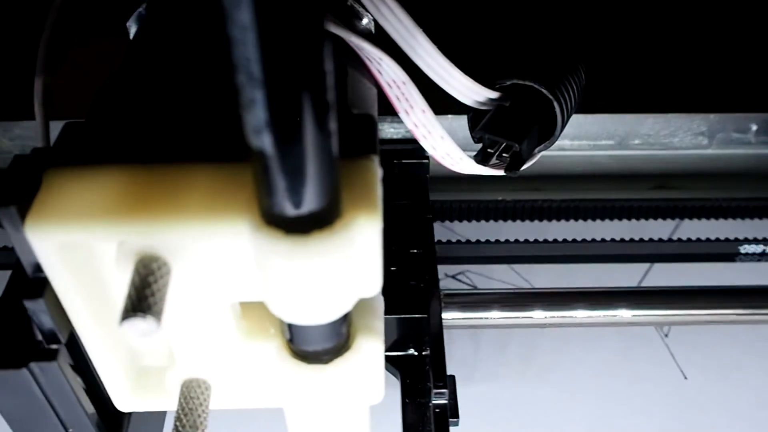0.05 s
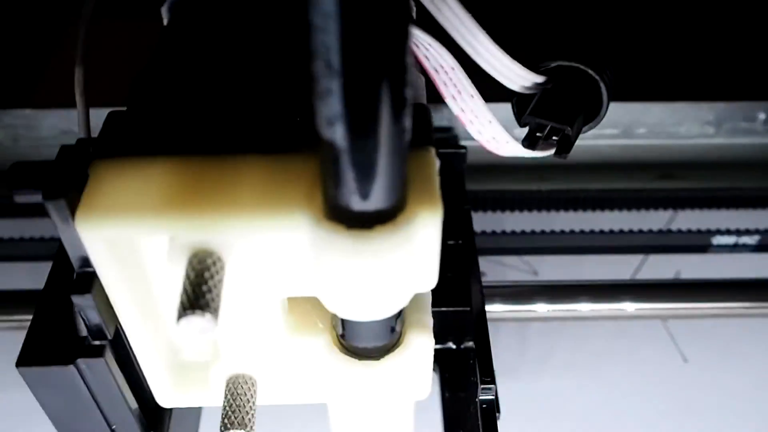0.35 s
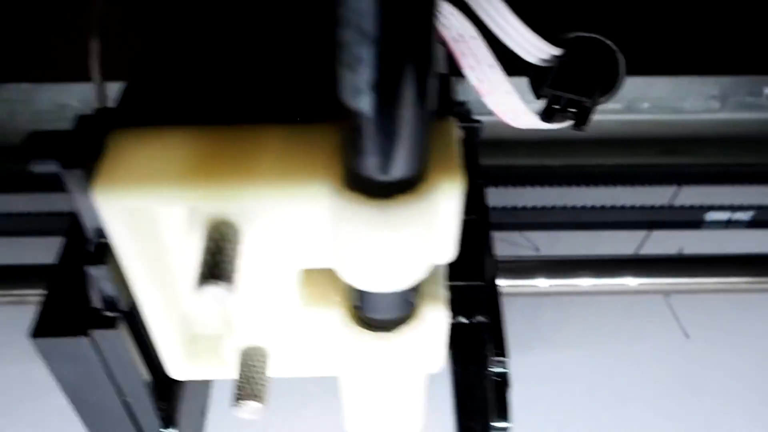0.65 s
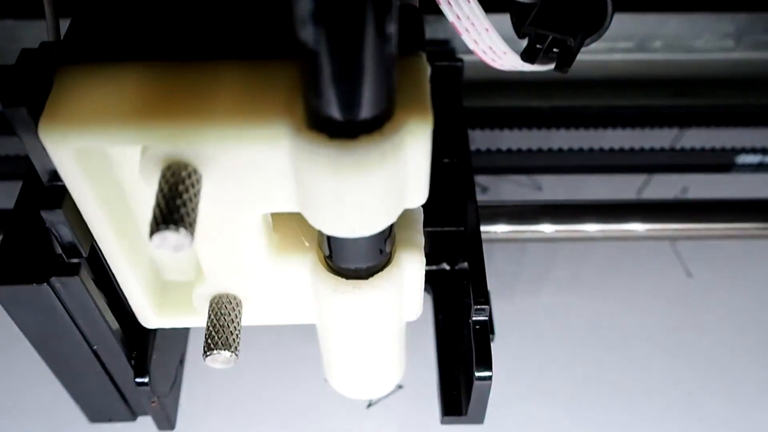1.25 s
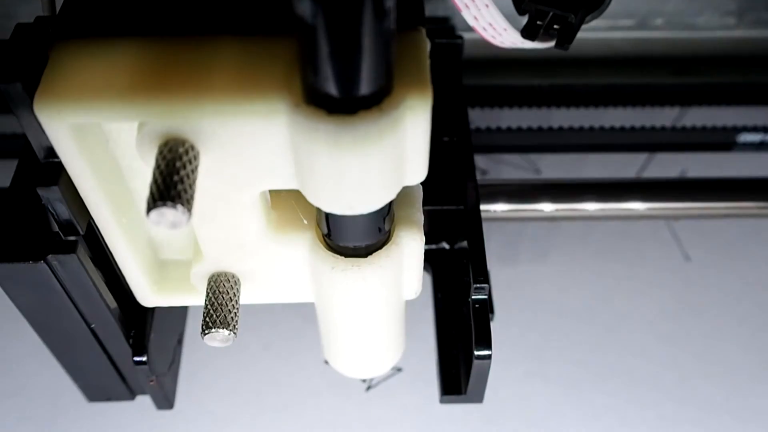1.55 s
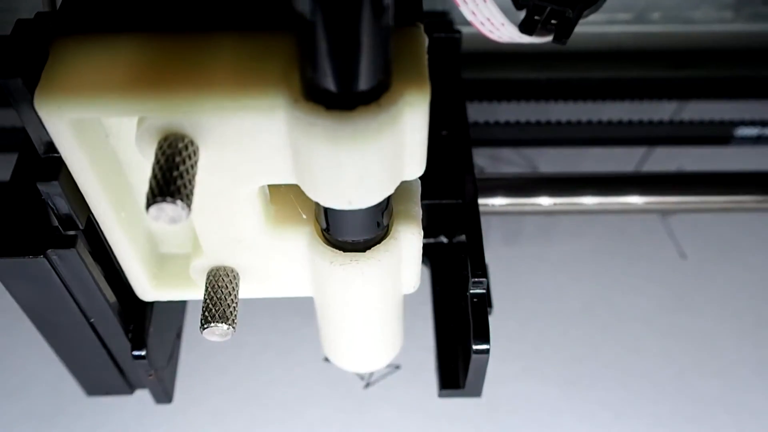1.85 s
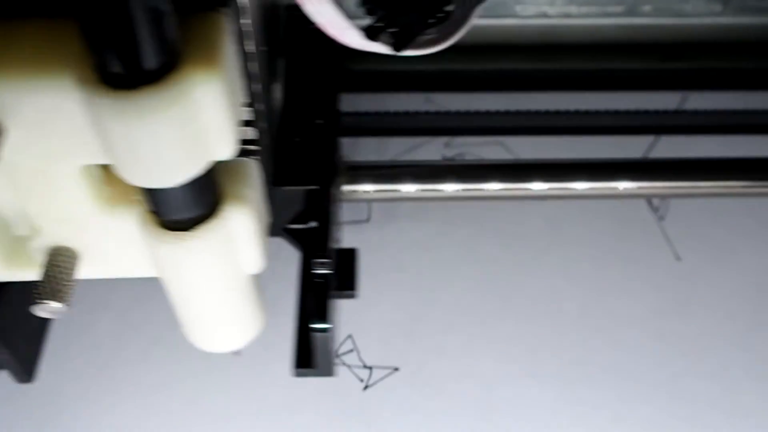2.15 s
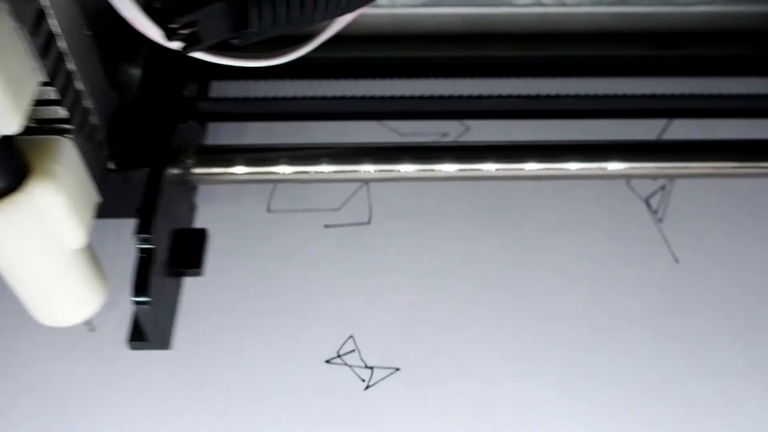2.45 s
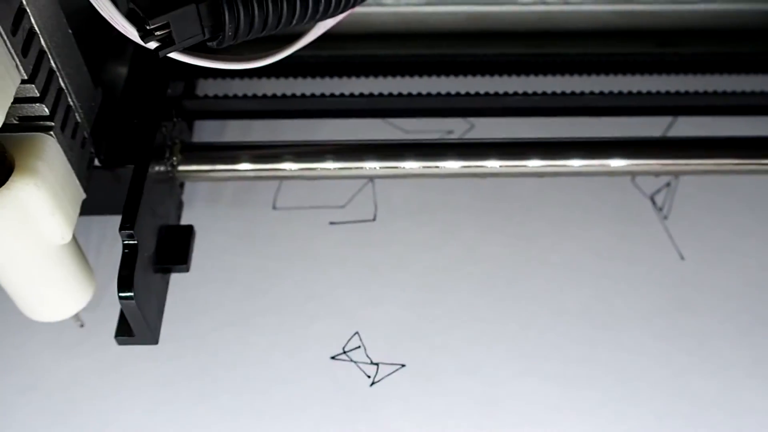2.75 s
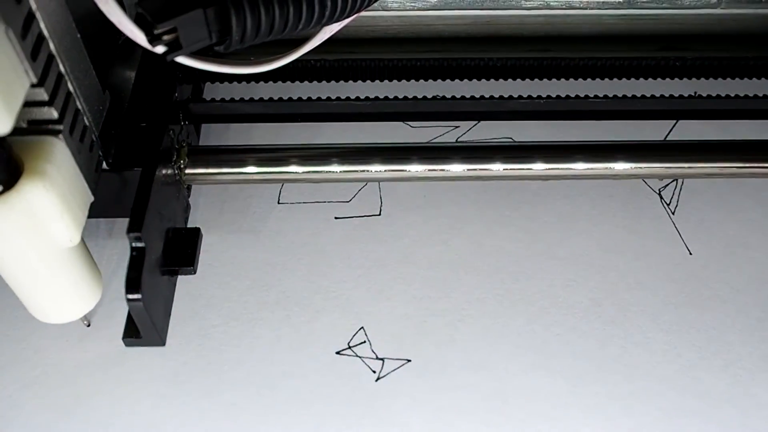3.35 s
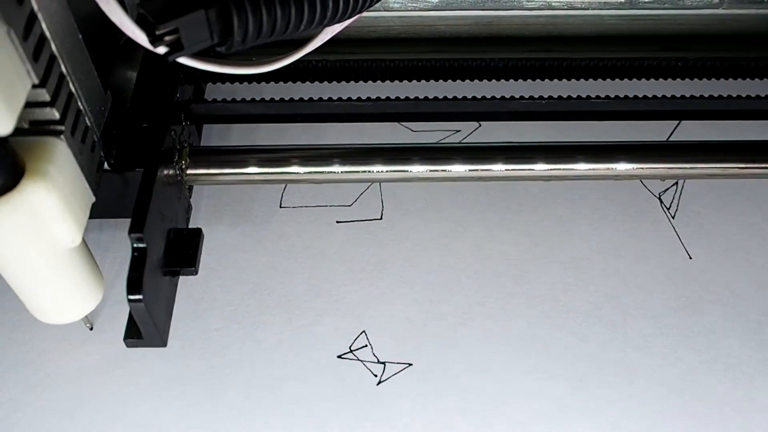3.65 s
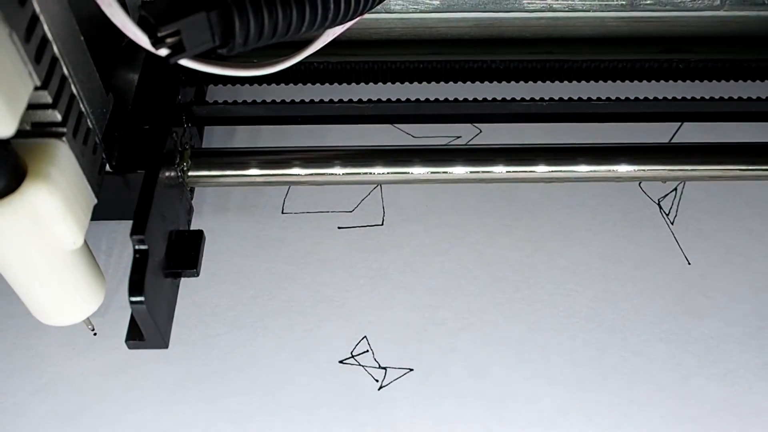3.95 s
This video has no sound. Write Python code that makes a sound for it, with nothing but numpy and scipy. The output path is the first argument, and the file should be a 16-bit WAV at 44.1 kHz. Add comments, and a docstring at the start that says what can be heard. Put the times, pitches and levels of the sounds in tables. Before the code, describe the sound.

Close to a pen plotter, small motors whir in rapid rising and falling bursts, then whine evenly before and after one fast, whistling carriage run. The frame shakes and metal parts tick while a fan runs underneath.

```python
"""Pen plotter, close up

Belt steppers finish a slow line, scribble seven quick strokes and make one long travel, whining at
their step rate; a screw motor sings before and after the travel. Starts and stops shake the frame,
and metal parts catch with a tick. Under it all runs a cooling fan with a rasping bearing."""
import sys
import numpy as np
from scipy import signal
from scipy.fft import rfft, irfft
from scipy.io import wavfile
from scipy.ndimage import uniform_filter1d

SR = 44100
rng = np.random.default_rng(int(sys.argv[2]) if len(sys.argv) > 2 else 0)


def unload_audio(sound):
    """Save the sound as a 16-bit wav file, at the path given as the first command line argument."""
    columns = np.transpose(np.atleast_2d(sound))
    # keep every value between -1 and 1, then stretch to whole-number steps
    steps = np.round(np.clip(columns, -1, 1) * 32767)
    wavfile.write(sys.argv[1], SR, steps.astype(np.int16))


N = 176400

FULL_STEP, COIL_CYCLE = 16, 64  # microsteps
BELT_ACCEL_HZ_PER_S, TRAVEL_ACCEL_HZ_PER_S, SCREW_ACCEL_HZ_PER_S = 95000, 107000, 39000
STEP_JITTER_RAD, FRAME_T60_S = 0.55, 0.17

# Stereo width of the noise, side over mid: freq_hz, side_db
WIDTH = [(60, -4), (110, -27), (200, -18), (380, -17.5), (700, -12.5), (1290, -2), (2380, -1.5), (4400, 2),
         (8120, 4.5), (15000, -2.5)]
# EQ of the shaking frame's mid growl, low rumble and bright rattle: freq_hz, gain_db
GROWL_EQ = [(50, -52), (150, -49), (270, -14), (340, -8), (450, 1.5), (620, -8), (800, -7.5), (1000, -14.5),
            (1400, -14.5), (2200, -28), (5000, -39)]
RUMBLE_EQ = [(25, -52), (60, -28), (90, -13), (118, -12), (143, 2.5), (190, -7), (235, -3), (300, -11.5),
             (600, -23), (3000, -72)]
RATTLE_EQ = [(60, -47), (500, -11), (1200, -0.5), (1700, -4.5), (2300, 2.5), (2800, 1), (3500, 1.5),
             (4900, -5), (6500, -18), (9000, -17), (13000, -9), (16000, -22)]
# Resonances of the frame and its rails: pitch_hz, width_hz, gain_db
FRAME_MODES = [(1584, 61, 4), (2390, 47, 8.5), (2740, 150, -4), (3420, 117, 10), (4180, 120, -4),
               (4790, 60, 3), (5080, 66, -3)]
# How well the frame radiates a step tone: freq_hz, gain_db
RADIATION_EQ = [(900, -9), (2400, 2), (5200, -2), (6000, -12.5), (7000, -10.5), (7800, -6.5), (9500, -5),
                (11500, -5), (13500, 4), (15000, -3), (16000, -10)]

# EQ of the fan's rush and of its bearing's rasp: freq_hz, gain_db
FAN_EQ = [(25, -45), (45, -13.5), (90, -5), (150, -0.5), (200, -2), (250, -1), (320, -12), (430, 0),
          (570, -4), (750, -2.5), (1000, -3.5), (1150, -4.5), (1400, -7), (1620, -18.5), (1850, -8),
          (2400, -17), (2750, -22), (3300, -21), (4300, -21), (5500, -29.5), (6800, -34.5), (8500, -28),
          (11000, -27), (13500, -20.5), (15600, -36)]
RASP_EQ = [(50, -43), (300, -9.5), (700, 5), (1150, 7), (1400, 5), (1620, 10), (2100, -9.5), (2400, 1),
           (2800, -12), (3330, -4.5), (3700, -5.5), (4600, -13.5), (6500, -36), (15000, -45)]
# Fader ride on the rasp: time_s, level_db
RASP_RIDE = [(0, -34.5), (1.4, -37), (1.8, -35), (2.7, -34), (3.15, -36), (3.6, -36.5), (4, -35)]
# Harder scrapes of the bearing: time_s, level_db
SCRAPES = [(1.476, -40.5), (2.857, -39), (3.258, -43.5), (3.655, -41.5), (3.882, -43)]

# The slow line's partials and high step overtones at cruise: pitch_hz, level_db
LINE_TONES = [(247.6, -54), (333.8, -38), (419.9, -42), (581.4, -32.5), (667.5, -42.5), (1491, -44.5),
              (1583, -52), (1916, -72), (2406, -52), (2982, -49), (3564, -51), (3671, -67), (3898, -58),
              (5055, -61.5), (11908, -60), (13399, -70)]
LINE_OVERTONES = [(5964, -64.5), (7455, -64), (8940, -63), (10425, -62)]
# Panning of belt and screw partials: pitch_hz, left_over_right_db
BELT_PAN = [(240, 0.5), (490, -1), (1510, -6), (2400, -24), (4500, 24.5), (7700, -1), (14000, 2)]
SCREW_PAN = [(240, -4.5), (870, 1), (2000, -3), (4000, -0.5), (14000, -5)]
# Their phase spread between the sides: pitch_hz, left_lead_rad
BELT_LEAD = [(240, 0.049), (550, -0.082), (1510, 1.64), (3000, 1.5), (7700, -1.36), (14000, 1.8)]
SCREW_LEAD = [(240, 0.24), (870, 0.57), (2000, -1.15), (4000, -1.5), (8000, -1.8), (14000, 1.5)]

# Quick pen strokes:
# middle_s, cruise_s, top_rate_hz, step_db, overtones_db, hum_db, growl_db, rumble_db, rattle_db
STROKES = [(0.294, 0.035, 7843, -43, -43, -33.5, -30, -40.5, -36.5),
           (0.427, 0.0019, 5646, -37.5, -42, -53, -52, -37, -40),
           (.545, 0.015, 7050, -41.5, -43, -50, -29.5, -34, -34.5),
           (0.682, 0.0051, 7460, -45, -42, -31.5, -28.5, -40, -37.5),
           (0.805, .003, 7137, -37.5, -45, -48, -40, -32.5, -39),
           (0.917, 0.0029, 5420, -37.5, -44, -56, -37, -34, -39),
           (1.023, 0.032, 5910, -37.5, -41, -40.5, -36.5, -34, -35)]
# The second motor and its beats with the first: step_rate_ratio, level_db
BEAT_TONES = [(0.189, -55), (0.329, -57), (0.439, -49), (0.571, -48), (0.811, -51)]
# EQ of the carriage's clatter: freq_hz, gain_db
CLATTER_EQ = [(60, -45), (500, -17), (1250, 0), (2050, -2), (2600, 0.5), (3800, -2.5), (4900, -4.5),
              (6200, -19), (8100, -11.5), (9500, -17.5), (13000, -8), (16000, -20)]
# Jolts of the frame: start_s, rise_s, decay_s, rumble_db, growl_db, rattle_db
JOLTS = [(0.227, 0.0044, .025, -30, -33, -50), (0.338, .006, 0.035, -49, -32, -47),
         (0.474, 0.0033, 0.012, -33, -24.5, -38), (.651, .003, 0.019, -40, -31, -42),
         (.715, 0.0035, 0.014, -34, -33, -46), (.83, 0.0054, 0.026, -42, -34, -32),
         (.871, 0.0021, 0.0093, -38, -28, -42), (1.052, .003, 0.0095, -32, -33, -46),
         (1.10, .004, 0.076, -33.5, -40.5, -46), (1.906, 0.013, 0.029, -35, -27.5, -53),
         (1.925, 0.013, 0.039, -25, -27.5, -37), (2.516, 0.0044, 0.04, -31.5, -25.5, -45),
         (2.56, .006, 0.045, -28, -44, -44), (3.39, 0.0045, 0.093, -38.5, -44, -41.5),
         (3.435, 0.0023, .008, -28, -48, -52)]
# Small metallic catches: start_s, level_db, pitch_hz, decay_s
TICKS = [(1.053, -19, 3457, .006), (2.335, -39, 3350, 0.0059), (3.141, -31, 870, .014),
         (3.141, -33.5, 1128, 0.014), (3.41, -21.5, 857, 0.0047), (3.514, -27.5, 505, 0.0086)]

# Runs of the screw motor: cruise_start_s, cruise_end_s, gain_db
SCREW_RUNS = [(1.132, 1.91, -0.5), (2.6, 3.358, 0.5), (3.436, 4.1, 0.2)]
# Its partials and high whistles at cruise: pitch_hz, level_db
SCREW_TONES = [(247.6, -55), (500.6, -51.5), (872.1, -42), (1125, -50), (1593, -53), (1873, -53),
               (1997, -35.5), (2030, -54.5), (2121, -58), (2498, -56), (3871, -60.5), (3994, -56.5),
               (5992, -72), (6492, -80), (7994, -70)]
SCREW_WHISTLES = [(9959, -65), (10024, -63), (11709, -71), (11956, -59), (12021, -59), (12392, -66),
                  (13329, -71), (13706, -72), (13954, -61), (14018, -58)]
# EQ of its microstep fizz: freq_hz, gain_db
FIZZ_EQ = [(2000, 6), (6500, -27), (8000, -16), (10000, 8), (13500, -3), (15500, 7)]

# The long travel's partials and its once-per-coil-cycle hum at cruise: pitch_hz, level_db
TRAVEL_TONES = [(242.2, -41.5), (489.9, -24), (1513, -35), (2369, -62.5), (3031, -51.5), (3268, -49.5),
                (4544, -61), (4786, -66), (4883, -69), (6298, -62.5), (7325, -66), (7447, -69),
                (7691, -46.5), (7813, -53), (7935, -51.5), (8057, -66), (8179, -61), (8909, -66),
                (10842, -65), (12575, -59), (14040, -63), (14772, -59), (15014, -62), (15504, -68)]
COIL_HUM = [(122, -48)]
# Fader ride on the travel's whistle: time_s, gain_db
WHISTLE_RIDE = [(1.99, -1.5), (2.07, 0.5), (2.18, 0.5), (2.33, -1), (2.43, -5.5), (2.48, -4)]

TIME_S, BIN_HZ = np.arange(N) / SR, np.arange(N // 2 + 1) * SR / N


def undb(db):
    """Decibels to gain."""
    return 10 ** (np.asarray(db) / 20)


def unit(x):
    """Scale to rms 1."""
    return x / np.sqrt(np.mean(x ** 2))


def at(curve, hz):
    """Read a curve on a log-frequency axis."""
    freqs, values = np.array(curve, float).T
    return np.interp(np.log(np.maximum(hz, 1)), np.log(freqs), values)


def ride(points):
    """Gain of a fader moved through timed decibel points."""
    return undb(np.interp(TIME_S, *np.array(points).T))


def colour(x, eq):
    """EQ a signal and scale it to rms 1."""
    return unit(irfft(rfft(x) * undb(at(eq, BIN_HZ)), N))


def noise(eq):
    """Coloured stereo noise, narrow in the bass and wide in the treble."""
    mid, side = rfft(rng.standard_normal((2, N)))
    side *= undb(at(WIDTH, BIN_HZ))
    return colour(irfft(np.array([mid + side, mid - side]), N), eq)


def waver(rate_hz):
    """Smooth random modulation at rms 1."""
    hold = int(SR / rate_hz)
    stairs = np.repeat(rng.standard_normal(N // hold + 1), hold)
    return unit(uniform_filter1d(uniform_filter1d(stairs, hold), hold)[:N])


def burst(start_s, rise_s, decay_s):
    """Hit envelope: a quick rise and an exponential tail."""
    age = np.maximum(TIME_S - start_s, 0)
    return (1 - np.exp(-age / rise_s)) * np.exp(-age / decay_s)


def lag(level, seconds):
    """Let a level build up and ring out."""
    keep = np.exp(-1 / (seconds * SR))
    return signal.lfilter([1 - keep], [1, -keep], level)


def resonate(x, hz, width_hz):
    """One resonance, gain 1 at its centre."""
    return signal.lfilter(*signal.iirpeak(hz, hz / width_hz, fs=SR), x)


def speed(start_s, end_s, top_hz, accel):
    """Share of top speed: a straight ramp up, a cruise from start_s to end_s, a straight ramp down."""
    outside_s = np.maximum(np.maximum(start_s - TIME_S, TIME_S - end_s), 0)
    return np.clip(1 - accel / top_hz * outside_s, 0, 1)


def fan(body, period_s=0.0574, rasp_width_s=0.009, scrape_width_s=0.0079):
    """The fan rushes steadily; its bearing rasps at nearly even intervals and at times scrapes harder."""
    cycles = (TIME_S + 0.001 * waver(16) - 1.189) / period_s + 0.5
    scatter_db = 1.5 * rng.standard_normal(128)[np.floor(cycles).astype(int)]
    pulses = np.exp(-0.5 * ((cycles % 1 - 0.5) * period_s / rasp_width_s) ** 2)
    rasp = ride(RASP_RIDE) * pulses * undb(scatter_db + 1.5 * waver(300))
    scrapes = sum(undb(db) * np.exp(-0.5 * ((TIME_S - s) / scrape_width_s) ** 2) for s, db in SCRAPES)
    bearing = rasp * noise(RASP_EQ) + scrapes * body["rattle"]
    ring = undb(2.5) * resonate(bearing, hz=3327, width_hz=83)
    return undb(-39.5) * noise(FAN_EQ) + bearing + ring


def whine(share, tones, waver_db, pan=BELT_PAN, lead=BELT_LEAD):
    """Stepper partials whose pitch follows the share of top speed, each wavering in level on its own."""
    phase_per_hz = 2 * np.pi * np.cumsum(share) / SR
    on, sides = share > 0, np.array([[0.5], [-0.5]])
    out = np.zeros((2, N))
    for hz, db in tones:
        lead_rad = at(lead, hz)
        gain = np.sqrt(2) * undb(db + waver_db * waver(22.32)[on] + sides * at(pan, hz))
        gain /= np.cos(min(abs(lead_rad), 2) / 2)  # make-up for what the phase spread cancels in mono
        out[:, on] += gain * np.sin(hz * phase_per_hz[on] + rng.uniform(0, 2 * np.pi) + sides * lead_rad)
    return out


def shake(body, growl_db, rumble_db, rattle_db):
    """The shaking frame: a mix of its three noise layers."""
    return (undb(growl_db) * body["growl"] + undb(rumble_db) * body["rumble"]
            + undb(rattle_db) * body["rattle"])


def slow_line(body):
    """Two belt steppers, already under way, whine and shake the frame until the line ends."""
    share = speed(start_s=-0.1, end_s=0.215, top_hz=2982, accel=BELT_ACCEL_HZ_PER_S)
    tones = undb(-2.5) * whine(share, [*LINE_TONES, *LINE_OVERTONES], waver_db=1)
    return share * (tones + shake(body, growl_db=-36, rumble_db=-39.5, rattle_db=-49))


def frame_ring(x):
    """Dense, short resonances of the frame, different on each side."""
    t = TIME_S[:SR // 4]
    tail = rng.standard_normal((2, len(t))) * np.exp(-np.log(1000) * t / FRAME_T60_S)
    tail[1] = 0.38 * tail[0] + 1.3 * tail[1]
    tail /= np.linalg.norm(tail, axis=1, keepdims=True)
    return signal.fftconvolve(x[None], tail, axes=1)[:, :N]


def frame_modes(x):
    """The few strong resonances of frame and rails."""
    return sum(undb(db) * resonate(x, hz, width_hz) for hz, width_hz, db in FRAME_MODES)


def chirp(rate_hz, step_gain, overtone_gain):
    """A gliding step tone with two overtones, rippled by uneven microsteps, rings the frame."""
    phase = 2 * np.pi * np.cumsum(rate_hz) / SR
    overtone_phase = phase + 0.42 * waver(900)
    flicker_db = 2 * waver(260)
    tone = step_gain * undb(at(RADIATION_EQ, rate_hz) + flicker_db)
    tone *= np.sin(phase + STEP_JITTER_RAD * waver(900))
    for harmonic, trim_db in (2, 0), (3, -5):
        hz = harmonic * rate_hz
        gain = overtone_gain * undb(at(RADIATION_EQ, hz) + trim_db) * (hz < SR / 2)
        tone += gain * np.sin(harmonic * overtone_phase)
    tone *= 1 + 0.4 * np.sin(phase / COIL_CYCLE) + 0.4 * np.sin(phase / FULL_STEP)
    return tone + 0.5 * frame_ring(tone) + undb(-10) * frame_modes(tone)


def scribble(body, fade_below_hz=1460, release_s=0.056):
    """Each stroke chirps up and down; the rattling carriage rings the rails, and the frame shakes on."""
    rates = np.array([hz * speed(middle - cruise / 2, middle + cruise / 2, hz, BELT_ACCEL_HZ_PER_S)
                      for middle, cruise, hz, *_ in STROKES])
    rate_hz = rates.max(axis=0)
    stroke = np.array(STROKES)[rates.argmax(axis=0)]  # the fastest stroke sets the mix
    share = rate_hz / stroke[:, 2]
    faders = uniform_filter1d(undb(stroke[:, 3:].T), size=400, axis=1)
    step, overtones, hum, growl, rumble, rattle = faders * np.clip(rate_hz / fade_below_hz, 0, 1)
    phase = 2 * np.pi * np.cumsum(rate_hz) / SR + STEP_JITTER_RAD * waver(900)
    beats = share * sum(undb(db) * np.sin(ratio * phase) for ratio, db in BEAT_TONES)
    full_step_hum = np.sqrt(2) * hum * share ** 2 * np.sin(phase / FULL_STEP)
    motors = chirp(rate_hz, step, overtones * share) + frame_ring(beats) + full_step_hum
    clatter = rattle * np.sqrt(share) * noise(CLATTER_EQ) * undb(2.9 * waver(350))
    frame = lag(growl * np.sqrt(share), release_s / 2) * body["growl"]
    frame += lag(rumble, release_s) * body["rumble"]
    return motors + frame + undb(-2) * clatter + frame_modes(clatter)


def jolts(body):
    """Changes of speed thump the frame."""
    return sum(burst(start_s, rise_s, decay_s) * shake(body, growl_db, rumble_db, rattle_db)
               for start_s, rise_s, decay_s, rumble_db, growl_db, rattle_db in JOLTS)


def ticks(rise_s=0.0011, rough_rad=0.42):
    """Metal parts catch and give a short, gritty ring."""
    out = np.zeros(N)
    for start_s, db, hz, decay_s in TICKS:
        ring = np.sqrt(2) * np.sin(2 * np.pi * hz * (TIME_S - start_s) + rough_rad * waver(900))
        out += undb(db) * burst(start_s, rise_s, decay_s) * ring
    return out


def screw_motor(body, top_hz=1997.6):
    """A steady step tone with a fizz on top; at part speed the tone glides and the mount rings."""
    runs = [speed(start_s, end_s, top_hz, SCREW_ACCEL_HZ_PER_S) for start_s, end_s, _ in SCREW_RUNS]
    share = np.max(runs, axis=0)
    fader = sum(undb(db) * run ** 4.4 for run, (_, _, db) in zip(runs, SCREW_RUNS))
    tones = whine(share, [*SCREW_TONES, *SCREW_WHISTLES], waver_db=0.95, pan=SCREW_PAN, lead=SCREW_LEAD)
    steps = np.cumsum(share) * top_hz / SR
    # Uneven microsteps repeat each coil cycle and make the fizz.
    step_sizes = rng.standard_normal((2, COIL_CYCLE))[:, steps.astype(int) % COIL_CYCLE]
    pulses = share * step_sizes * np.exp(-((steps % 1 - 0.5) / 0.04) ** 2)
    fizz = undb(-55.5) * colour(pulses, FIZZ_EQ)
    phase = 2 * np.pi * steps + STEP_JITTER_RAD * waver(900)
    glide = 2 * share * np.sqrt(1 - share) * (undb(-39) * np.sin(phase) + undb(-45) * np.sin(2 * phase))
    strain = lag(2 * np.sqrt(share * (1 - share)), seconds=0.0036)
    mount_ring = undb(-39) * unit(resonate(body["growl"], hz=910, width_hz=190))
    shudder = undb(-46) * body["rumble"]
    return fader * (tones + fizz) + glide + 0.5 * frame_ring(glide) + strain * (mount_ring + shudder)


def long_travel(body, start_s=1.982, end_s=2.487, top_hz=7813, tooth_hz=15, swell_db_per_s=5.5):
    """A fast belt run: the hum builds and throbs with the belt teeth, the whistle swells and fades."""
    share = speed(start_s, end_s, top_hz, TRAVEL_ACCEL_HZ_PER_S)
    lows, mids, highs = ([(hz, db) for hz, db in TRAVEL_TONES if low_hz <= hz < high_hz]
                         for low_hz, high_hz in [(0, 1000), (1000, 6000), (6000, SR)])
    throb_db = 1.2 * np.cos(2 * np.pi * tooth_hz * (TIME_S - 2.222))
    swell_db = 0.35 + swell_db_per_s * (TIME_S - (start_s + end_s) / 2)
    hum_gain = undb(throb_db + swell_db) * lag(share ** 6, seconds=0.013)
    hum = hum_gain * whine(share ** 0.246, [*COIL_HUM, *lows], waver_db=1)  # bends less on the ramps
    song = share ** 5 * whine(share, mids, waver_db=0.67)
    whistle = share ** 20 * ride(WHISTLE_RIDE) * whine(share, highs, waver_db=0.9)
    ramping = share * (1 - share)
    ramp_chirps = chirp(share * top_hz, undb(-30) * ramping, undb(-34) * ramping)
    frame = share * shake(body, growl_db=-37.5, rumble_db=-46, rattle_db=-44)
    return hum + song + whistle + ramp_chirps + frame


def scene():
    """Mix the plotter; its parts draw on the same three layers of frame noise."""
    body = {"growl": noise(GROWL_EQ) * undb(0.9 * waver(90)),
            "rumble": noise(RUMBLE_EQ),
            "rattle": noise(RATTLE_EQ) * undb(2.8 * waver(350))}
    return (fan(body) + slow_line(body) + scribble(body) + jolts(body) + ticks()
            + screw_motor(body) + long_travel(body))


def record(dry):
    """A steep low-pass at 15750 Hz trims the very top."""
    return signal.sosfilt(signal.ellip(12, 0.2, 80, 15750, fs=SR, output="sos"), dry)


dry = scene()
out = record(dry)
unload_audio(out)
```